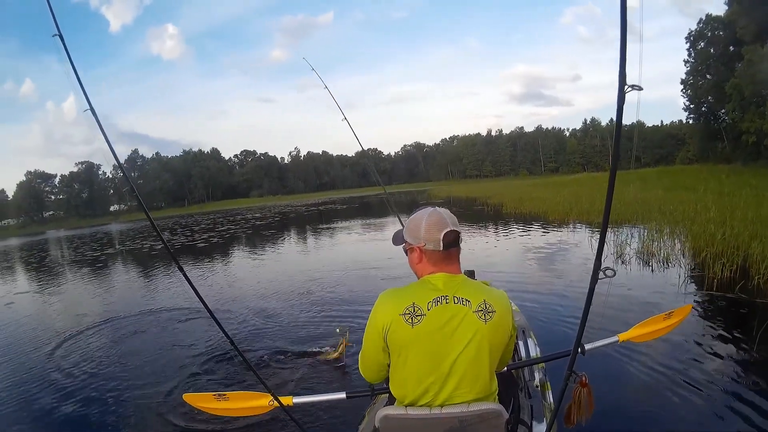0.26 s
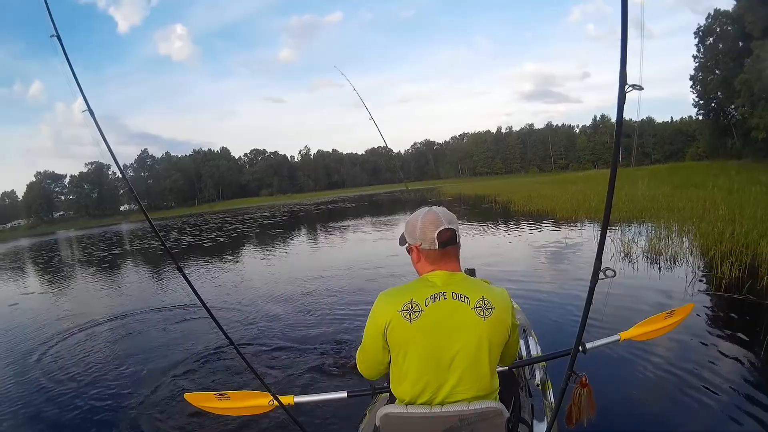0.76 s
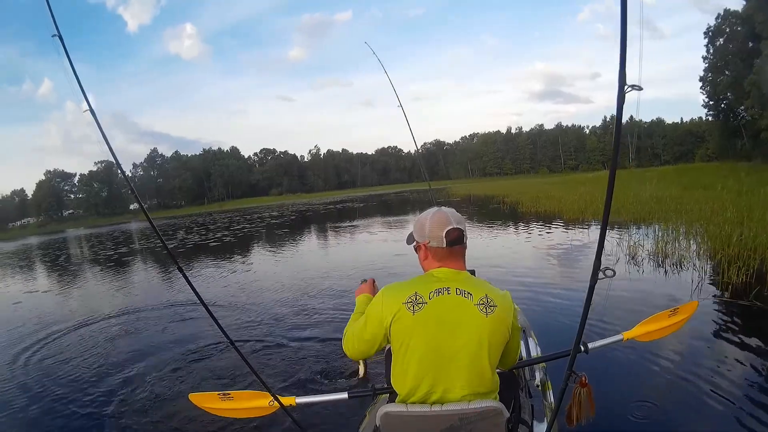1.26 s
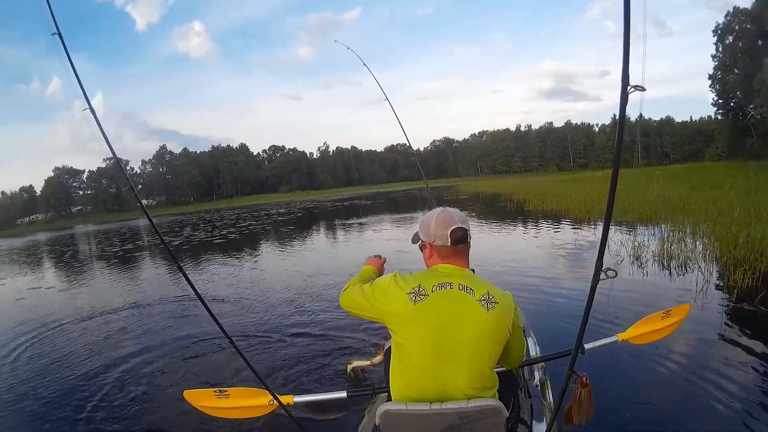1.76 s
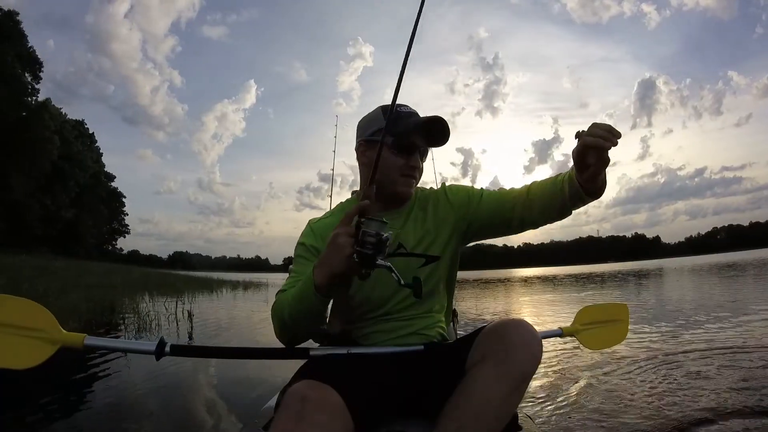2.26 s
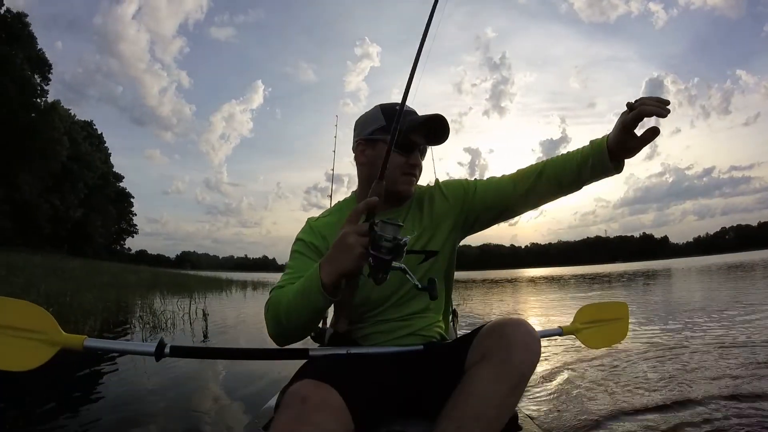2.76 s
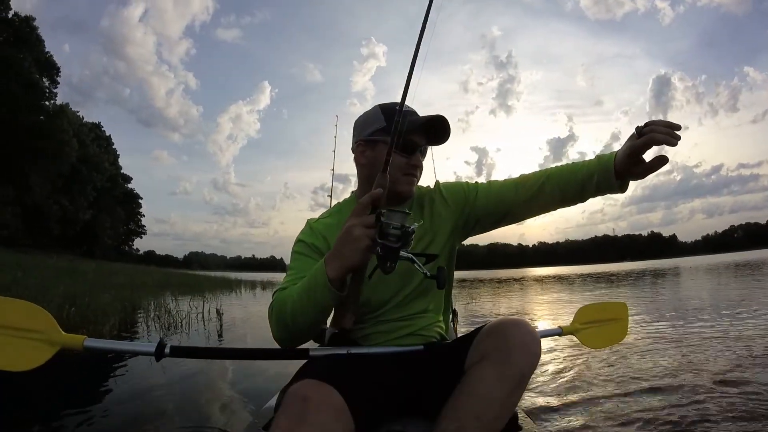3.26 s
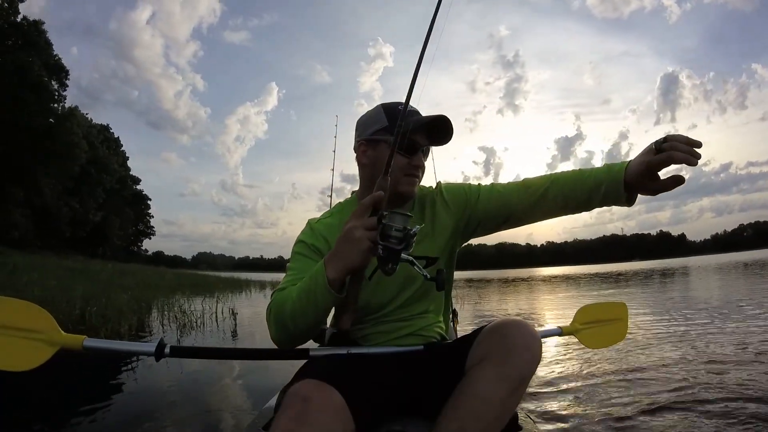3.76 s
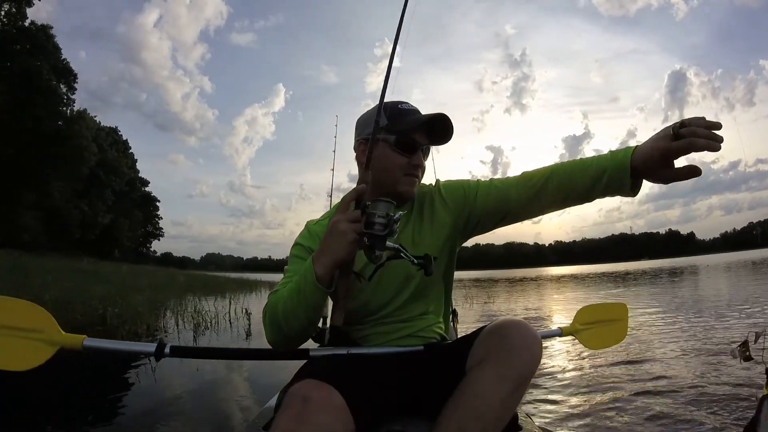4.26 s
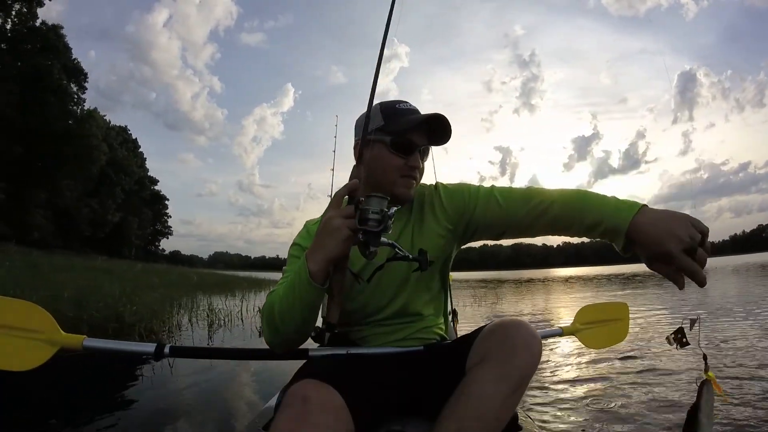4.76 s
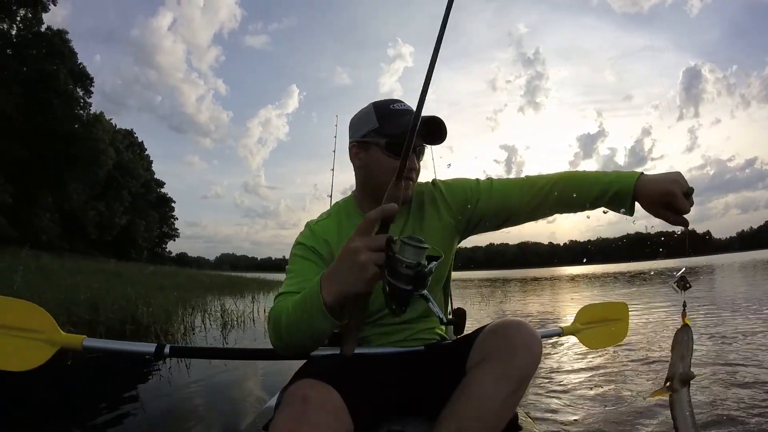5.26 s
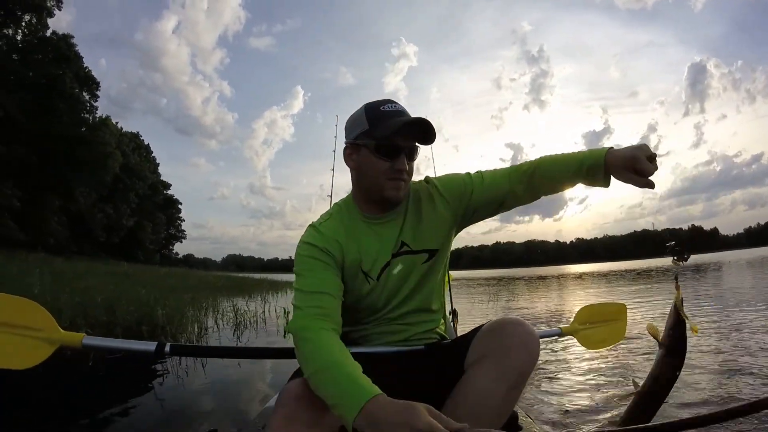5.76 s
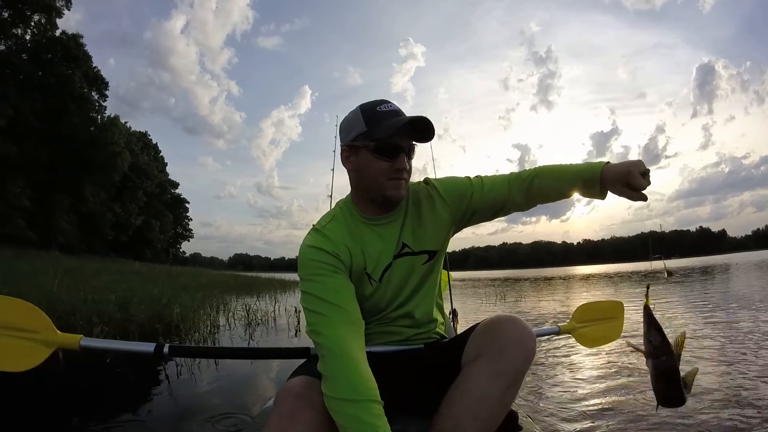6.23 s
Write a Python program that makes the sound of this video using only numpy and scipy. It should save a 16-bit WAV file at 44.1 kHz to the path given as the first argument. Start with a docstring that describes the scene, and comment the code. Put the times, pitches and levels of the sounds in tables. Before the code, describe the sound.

Outdoors on a still lake, heard close beside a kayak over soft air hiss and a low breeze. From the start a warbler whistles a rapid, sweet, high phrase, repeated around 0.6 and 1.3 seconds with a diffuse echo, breaking off near 1.5. From 0.25 to 1.6 a fish thrashes: wet slaps, spray, plopping bubbles and rising gulps, with bright metallic lure jingles, strongest around 1.0 to 1.4. A brief lull holds a few drips near 2.1 to 2.3. From 2.45 to 3.2 a second flurry gurgles and splashes, its rattle sharpest at 2.9. Then it calms; faint far birds chirp at 3.4 to 4.0. Small drips fall at 4.8 and 5.0 as wind buffeting swells and stays. A light hull knock comes at 5.0, lower distant bird notes at 5.1 to 5.4, a lure jingle at 5.65, a tiny tick at 6.1, and a heavier hollow plastic clatter at 6.35.

```python
"""Still lake, beside a kayak: a hooked fish thrashes, a warbler sings on the shore and fainter birds answer.
Bubbles and gulps are gliding sines, small bubbles damped sines; slaps and spray are noise through resonances.
The lure's metal parts rattle as noise bursts ringing narrow modes; birds are gliding sines with a diffuse echo.
A breeze of shaped noise rises on the microphone over hiss; a rod knocks on the plastic hull, ringing its modes."""
import sys
import numpy as np
from scipy import signal
from scipy.fft import rfft, irfft, next_fast_len
from scipy.io import wavfile
from scipy.ndimage import uniform_filter1d, map_coordinates

SR = 44100
rng = np.random.default_rng(int(sys.argv[2]) if len(sys.argv) > 2 else 0)


def put_to_file(sound):
    """Save the sound as 16-bit audio at rate SR, in the file named by the first command-line argument."""
    columns = np.atleast_2d(sound).T  # one column per channel
    safe = np.clip(columns, -1, 1)
    whole_steps = np.round(safe * 32767)
    wavfile.write(sys.argv[1], SR, whole_steps.astype(np.int16))


N = 286473

# Thrashes of the fish. Each row: start in seconds, hold in seconds, then relative levels in dB of
# spray and drops, deep gurgle, jingle of the lure.
THRASHES = [(0.265, 0.016, -58, -65, -55), (0.358, 0.023, -46.5, -44.5, -63),
            (0.532, 0.0073, -46, -45.5, -60), (0.722, 0.07, -43.5, -43, -57.5),
            (0.94, 0.017, -44, -48.5, -46.5), (1.04, 0.013, -45, -45, -46.5),
            (1.177, 0.0079, -47, -47, -53), (1.338, 0.048, -52, -49.5, -47), (2.102, 0.17, -55, -58.5, -61),
            (2.497, 0.033, -50, -50.5, -51.5), (2.641, 0.062, -48.5, -45.5, -54),
            (2.882, 0.037, -43.5, -57.5, -43), (3.022, 0.016, -39, -45, -46)]
# Floor between thrashes. Each row: time in seconds, relative levels in dB of churn and jingle.
CALM = [(0, -59.5, -65.5), (1.6, -55.5, -61.5), (2, -66.5, -85), (3.1, -56.5, -63), (3.5, -66, -74.5),
        (6.5, -62, -74.5)]


def amp(db):
    """Decibels to gain."""
    return 10 ** (np.asarray(db) / 20)


def unit(x):
    """Scaled to rms 1."""
    return x / np.sqrt(np.mean(x ** 2) + 1e-20)


def curves(rows):
    """One value per sample, interpolated, for each column after the time in seconds."""
    time_s, *columns = np.transpose(rows)
    return [np.interp(np.arange(N) / SR, time_s, column) for column in columns]


def wobble(rate_hz):
    """Smooth random curve with rate_hz knots a second."""
    knots = rng.standard_normal(int(N * rate_hz / SR) + 4)
    return map_coordinates(knots, [np.arange(N) * rate_hz / SR])


def filtered(x, response):
    """x through a complex response of frequency in Hz."""
    m = next_fast_len(N + SR // 2)
    return irfft(rfft(x, m) * response(np.fft.rfftfreq(m, 1 / SR)), m)[:N]


def colour(points):
    """Gain through (Hz, dB) points, interpolated on a log frequency axis."""
    point_hz, db = np.transpose(points)
    return lambda hz: amp(np.interp(np.log(hz + 1), np.log(point_hz + 1), db))


def resonant(modes):
    """Causal response: band-pass resonances (Hz, width Hz, dB) summed with alternating sign."""
    def response(f):
        total = 0
        for k, (hz, width_hz, db) in enumerate(modes):
            damping = 1j * f * width_hz
            total = total + (-1) ** k * amp(db) * damping / (hz * hz - f * f + damping)
        return total
    return response


def add(out, start_s, sound):
    """Mixes a sound in at start_s, clipped to the ends of out."""
    i = round(start_s * SR)
    part = out[max(i, 0):i + len(sound)]
    part += sound[max(-i, 0):][:len(part)]


def slide(first_hz, last_hz, life_s, change_db, rise_s, fall_s):
    """Sine gliding exponentially in pitch and level, with linear edges."""
    u = np.arange(int(life_s * SR)) / (life_s * SR)
    edges = np.minimum(1, np.minimum(u * life_s / rise_s, (1 - u) * life_s / fall_s))
    pitch_hz = first_hz * (last_hz / first_hz) ** u
    return edges * amp(change_db * u) * np.sin(2 * np.pi * np.cumsum(pitch_hz) / SR)


def patter(rate_hz, spread_db, t60_s):
    """Noise broken into sudden bursts of random size that die away."""
    starts = (rng.random(N) < rate_hz / SR) * amp(spread_db * rng.standard_normal(N))
    envelope = signal.lfilter([1], [1, -amp(-60 / (t60_s * SR))], starts)
    return envelope * rng.standard_normal(N)


def puff(t60_s, rise_s=0.00059):
    """Short noise burst with exponential rise and decay."""
    t = np.arange(SR // 10) / SR
    return amp(-60 * t / max(t60_s, .002)) * (1 - np.exp(-t / rise_s)) * rng.standard_normal(len(t))


def smear(x, t60_s, db):
    """x plus a diffuse tail: convolution with decaying noise."""
    t = np.arange(SR // 2) / SR
    tail = amp(-60 * t / t60_s) * rng.standard_normal(len(t))
    return x + amp(db) * signal.fftconvolve(x, tail / np.linalg.norm(tail))[:len(x)]


def surges(rows, calm_db):
    """Gain: the calm floor plus (start s, hold s, dB) surges with dB-linear flanks."""
    rise_db_per_s, fall_db_per_s = 277, 229
    t = np.arange(N) / SR
    gain = amp(calm_db)
    for start_s, hold_s, db in rows:
        before_s = np.maximum(start_s - t, 0)
        after_s = np.maximum(t - start_s - hold_s, 0)
        gain = gain + amp(db - rise_db_per_s * before_s - fall_db_per_s * after_s)
    return gain


def air():
    """Lumpy breeze buffeting the microphone, low-weighted noise, over nearly steady air and hiss."""
    # Each row: time in seconds, buffeting level in dB.
    breeze_levels = [(0, -56), (0.3, -49), (1.2, -47), (2, -50), (4.45, -49.5), (4.8, -38.5), (5.3, -39.5),
                     (6.5, -38.5)]
    # Buffeting spectrum. Each row: frequency in Hz, relative density in dB per Hz.
    rumble_spectrum = [(8.8, -17), (43, 2.5), (114, -5), (179, -10.5), (500, -35), (1100, -120)]
    # Lake air and microphone hiss. Each row: frequency in Hz, relative density in dB per Hz.
    hiss_spectrum = [(59, -33), (100, -14), (234, -0.5), (381, -5.5), (621, -6.5), (1330, -16.5),
                     (5420, -27), (14400, -45.5), (16000, -61)]
    lumps = amp(1.5 * wobble(8) + 2.2 * wobble(25))
    rumble = filtered(rng.standard_normal(N), colour(rumble_spectrum))
    breeze = amp(curves(breeze_levels)[0]) * unit(lumps * rumble)
    hiss = unit(filtered(rng.standard_normal(N), colour(hiss_spectrum)))
    return breeze + amp(-52 + 0.19 * wobble(23)) * hiss


def birds():
    """Whistles as gliding sines, level fluttering, trailed by echoes from the tree line."""
    # The warbler's six notes, a list of rows each: seconds after note start, pitch in Hz, level in dB.
    notes = [
        [(0, 5796, -45), (.015, 5800, -31.5), (.026, 5500, -43), (.034, 4800, -38), (.055, 4540, -40)],
        [(0, 4206, -61), (.015, 4110, -40.5), (.045, 3430, -45), (.07, 2590, -74)],
        [(0, 3900, -63), (.035, 4570, -38.5), (.055, 5020, -41.5), (.1, 5050, -72)],
        [(0, 4360, -51), (.04, 4020, -36), (.065, 3600, -50), (.08, 2890, -40)],
        [(0, 2750, -64), (.035, 3150, -50.5), (.05, 4600, -49), (.06, 4780, -35.5), (.072, 4200, -46),
         (.092, 3600, -40.5)],
        [(0, 4700, -70), (.012, 5020, -44), (.028, 5280, -37.5), (.11, 5300, -69)],
    ]
    # Start of each note in the phrase, in seconds.
    note_starts_s = [0, .117, .19, .316, .467, .555]
    # Starts of the phrase, in seconds.
    phrase_starts_s = [-.052, .615, 1.27]
    # Far birds. Each row: start in seconds, first Hz, last Hz, life in seconds, starting level in dB.
    far_slides = [(3.44, 3300, 4300, .05, -63), (3.55, 5100, 3400, .06, -62), (3.7, 3900, 5400, .04, -63),
                  (3.93, 5500, 4900, .03, -65), (5.125, 2600, 2480, .065, -60), (5.2, 2200, 2060, .12, -61),
                  (5.35, 2450, 2100, .095, -61), (5.83, 2400, 2150, .08, -63)]
    last_s = 1.5  # the warbler breaks off in the third phrase
    out = np.zeros(SR + N)  # starts a second early, so that earlier notes leave their echo
    for note, offset_s in zip(notes, note_starts_s):
        time_s, hz, db = np.transpose(note)
        t = np.arange(0, time_s[-1], 1 / SR)
        pitch_hz = uniform_filter1d(np.interp(t, time_s, hz), size=200, mode="nearest")
        level = signal.windows.tukey(len(t), .15) * amp(np.interp(t, time_s, db))
        whistle = level * np.sin(2 * np.pi * np.cumsum(pitch_hz) / SR)
        for phrase_s in phrase_starts_s:
            if phrase_s + offset_s < last_s:
                add(out, 1 + (phrase_s + offset_s), whistle)
    for start_s, first_hz, last_hz, life_s, db in far_slides:
        add(out, 1 + start_s, amp(db) * slide(first_hz, last_hz, life_s, -2.7, 0.0082, 0.0058))
    echo = (smear(out, 0.45, -3.5) - out)[SR:]
    flutter = amp(2.5 * wobble(90))
    # the leaves swallow the highest notes of the echo
    return flutter * out[SR:] + filtered(echo, lambda hz: 1 / (1 + (hz / 5500) ** 16))


def fizz(hz, octaves, cycles, count):
    """Random small bubbles: damped sines rising in pitch; lower ones ring longer."""
    draw, when = rng.standard_normal((count, 2)), rng.random((count, 1))
    pitch_hz = hz * 2 ** (octaves * draw[:, :1])
    turns = pitch_hz * np.arange(1000) / SR
    size = amp(4.3 * draw[:, 1:])
    grain = size * np.exp(-turns / cycles) * (1 - np.exp(-2 * turns))
    grain = grain * np.sin(2 * np.pi * turns * (1 + .04 * turns / cycles))
    index = (when * N).astype(int) + np.arange(1000)
    return unit(np.bincount(index.ravel(), grain.ravel(), N + 1000)[:N])


def water():
    """Ringing bubbles, swelling gulps, slaps, and a churn of small bubbles and spray driven by thrashes."""
    # Bubbles that ring and die away. Each row: start in seconds, first Hz, last Hz, life in seconds,
    # starting level in dB.
    ringing_bubbles = [(0.25, 740, 485, 0.014, -25), (0.3519, 820, 670, 0.011, -27),
                       (0.418, 820, 860, 0.013, -25.5), (0.5085, 640, 571, 0.0083, -29),
                       (0.6534, 394, 520, 0.014, -28), (0.6826, 740, 830, 0.011, -25),
                       (0.6982, 664, 780, 0.0096, -19.5), (0.7586, 1040, 700, 0.0054, -30),
                       (0.9458, 730, 750, 0.013, -25), (1.0766, 925, 950, 0.016, -33),
                       (1.1813, 660, 615, 0.051, -32), (1.2751, 540, 478, 0.044, -35),
                       (1.5644, 594, 666, 0.016, -31), (1.5804, 754, 520, 0.009, -30),
                       (1.5919, 735, 1560, 0.022, -33), (2.132, 1130, 800, 0.0092, -34.5),
                       (2.161, 572, 790, 0.085, -39), (2.205, 990, 1530, 0.028, -39.5),
                       (2.4568, 850, 600, 0.0057, -23), (2.5495, 920, 965, 0.023, -27),
                       (2.6008, 485, 325, 0.03, -25.5), (2.6226, 724, 950, 0.006, -17),
                       (2.6239, 217, 504, 0.023, -22), (2.6969, 614, 766, 0.036, -24.5),
                       (2.7445, 357, 710, 0.022, -23), (2.7989, 553, 586, 0.029, -33.5),
                       (2.642, 274, 352, 0.013, -30), (3.0231, 1020, 814, 0.011, -26),
                       (3.0327, 470, 650, 0.0068, -22), (3.106, 990, 900, 0.009, -30),
                       (3.1208, 890, 850, 0.011, -24.5), (3.1854, 645, 1190, 0.035, -35),
                       (4.778, 1030, 870, 0.029, -40.5)]
    # Air pockets that swell until they close. Columns as for the bubbles.
    air_pockets = [(0.265, 297, 1090, 0.045, -28), (0.4445, 268, 452, 0.038, -42.5),
                   (0.715, 837, 423, 0.021, -31), (0.802, 640, 890, 0.011, -37),
                   (1.144, 313, 970, 0.02, -22.5), (1.164, 950, 810, 0.011, -31),
                   (1.4725, 780, 1190, 0.006, -34.5), (2.5243, 627, 1070, 0.0136, -38),
                   (2.5762, 770, 693, 0.0058, -17.5), (2.9817, 928, 890, 0.041, -40.5)]
    # Water slapping the surface. Each row: start in seconds, relative level in dB, pitch in Hz.
    slaps = [(0.2484, -31.5, 2100), (0.3675, -35, 2220), (0.457, -37, 2284), (0.5523, -38, 2400),
             (0.663, -39, 2410), (0.718, -30.5, 1950), (0.748, -27.5, 1990), (0.8003, -27, 1880),
             (0.819, -39, 2040), (0.842, -37, 2100), (0.908, -34, 2310), (0.965, -33, 1960),
             (1.011, -47, 3120), (1.034, -34, 2500), (1.144, -34, 1990), (1.1912, -34, 2180),
             (2.089, -36.5, 2370), (2.112, -42, 2900), (2.1537, -36, 1930), (2.2038, -31, 2230),
             (2.247, -42, 2630), (2.2633, -39, 2170), (2.2798, -35, 1970), (2.4562, -28.5, 2150),
             (2.606, -41, 3500), (2.6226, -39.5, 2360), (2.658, -29.5, 2070), (2.8939, -34, 1900),
             (2.9363, -35.5, 1930), (3.052, -31.5, 2180), (3.072, -35, 2000), (3.177, -41, 2170),
             (4.7792, -46, 2244), (4.999, -40, 1710)]
    out, spray = np.zeros(N), np.zeros(N)
    for table, change_db in (ringing_bubbles, -21), (air_pockets, 5.5):  # change over a life
        for start_s, first_hz, last_hz, life_s, db in table:
            add(out, start_s, amp(db) * slide(first_hz, last_hz, life_s, change_db, 0.0013, 0.0026))
    for start_s, db, hz in slaps:
        trapped_bubble = slide(hz, 1.04 * hz, 0.0074, -7.0, 0.0015, 0.0039)
        add(out, start_s, amp(db) * trapped_bubble)
        add(spray, start_s, amp(db + 7.0) * puff(0.015))
    gurgle = amp(2.5) * fizz(785.5, 0.327, 4.93, count=1300)
    plinks = amp(-6.5) * fizz(2086, 0.218, 8.4, count=1400)
    plinks += amp(-11.5) * fizz(3424, 0.31, 6.1, count=1500)
    churn_db = curves(CALM)[0]
    stir = surges([row[:3] for row in THRASHES], churn_db)
    deep = surges([(start_s, hold_s, db) for start_s, hold_s, _, db, _ in THRASHES], churn_db)
    spray += amp(-2) * stir * unit(patter(150, 5.3, 0.0048))
    # ripples shake the bubbles, the hull side answers
    bubbles = smear(amp(0.64 * wobble(120)) * out, 0.084, -8)
    splash = filtered(spray, resonant([(800, 270, 6.0), (2173, 400, 10.0), (4500, 1300, -3.5)]))
    return bubbles + deep * gurgle + stir * plinks + splash


def lure():
    """Loose metal parts: noise bursts ring narrow modes; drops flung off them crackle broadly."""
    # Hard shakes. Each row: start in seconds, relative level in dB.
    shakes = [(0.7168, -26.5), (0.9627, -23), (1.041, -34), (1.2465, -27), (1.2545, -28), (1.271, -22.5),
              (1.297, -38), (1.327, -27.5), (1.339, -32), (1.37, -36), (1.404, -32), (1.424, -36),
              (1.466, -41), (1.5715, -41), (2.0742, -34), (2.447, -30.5), (2.6554, -34), (2.68, -32.5),
              (2.8558, -31), (2.874, -22.5), (2.894, -19.5), (2.9225, -28), (2.9295, -30), (2.959, -31),
              (2.9969, -30.5), (3.03, -30), (3.051, -31.5), (3.1754, -40), (5.1153, -47.5), (5.238, -46.5),
              (5.564, -40.5), (5.6505, -27.5), (5.692, -36), (5.717, -32), (5.872, -47)]
    # Jerks of the fish in the air. Each row: start in seconds, hold in seconds, relative level in dB.
    jerks = [(5.655, 0.039, -46), (5.77, 0.16, -61.5), (6.35, 0.094, -62.5)]
    # Ringing modes of the metal. Each row: frequency in Hz, width in Hz, relative level in dB.
    metal_modes = [(6110, 187, 6), (6486, 98, 3.5), (8040, 23, -5), (11380, 100, -6), (12220, 200, -10)]
    # Mode that rings only out of the water. Columns as for the metal modes.
    free_mode = [(6630, 79, 7.7)]
    hangs_s = 4.9  # out of the water from here
    thrash_jingles = [(start_s, hold_s, db) for start_s, hold_s, *_, db in THRASHES]
    jingle = surges(thrash_jingles + jerks, curves(CALM)[1])
    chatter = amp(11.5) * jingle * unit(patter(160, 4, 0.023))
    for start_s, db in shakes:
        add(chatter, start_s, amp(db + 10.0) * puff(0.02, 0.00077))
    steep = resonant([(8170, 4900, 0)])  # sharpens the modes' skirts
    ring = np.zeros(N)
    for mode in metal_modes:
        # as the parts tumble, each mode is struck harder or softer from moment to moment
        strike = amp(3.0 * wobble(60)) * chatter
        ring += filtered(strike, lambda f: resonant([mode])(f) * steep(f))
    hanging = np.arange(N) > hangs_s * SR
    free_strike = amp(-3.5 + 10 * wobble(60)) * chatter * hanging
    ring += filtered(free_strike, lambda f: resonant(free_mode)(f) * steep(f))
    crackle = filtered(chatter, resonant([(3220, 590, -7.0), (12000, 1000, -17.5)]))
    return ring + crackle


def hull():
    """Rod on plastic: each blow rings the shell's low modes and cracks at the contact."""
    # Blows. Each row: start in seconds, relative thud level in dB, relative crack level in dB.
    blows = [(5.018, -33, -27), (5.035, -34.5, -45), (6.115, -58, -38.5), (6.137, -60, -40.5),
             (6.329, -23.5, -25), (6.335, -18, -39), (6.342, -32.5, -36), (6.351, -18, -35),
             (6.364, -45, -30), (6.39, -19, -56)]
    # Shell modes. Each row: frequency in Hz, mean relative level in dB, 60 dB decay in seconds.
    shell_modes = [(232, 6, 0.029), (318, -7.5, 0.055), (449, -1.5, 0.058), (888, -12.5, 0.04)]
    # Contact resonances. Each row: frequency in Hz, width in Hz, relative level in dB.
    crack_modes = [(810, 130, 8.5), (2240, 730, 3), (3410, 320, 8.5), (4600, 2100, -4)]
    out, cracks, t = np.zeros(N), np.zeros(N), np.arange(SR // 5) / SR
    for start_s, thud_db, crack_db in blows:
        ring = np.zeros(len(t))
        for hz, db, t60_s in shell_modes:
            level_db = db + rng.normal(0, 2.5)  # varies from blow to blow
            ring += amp(level_db - 60 * t / t60_s) * np.sin(2 * np.pi * hz * t)
        add(out, start_s, -amp(thud_db) * ring * (1 - np.exp(-t / 0.0016)))
        add(cracks, start_s, amp(crack_db + 5.5) * puff(0.019))
    return out + filtered(cracks, lambda f: resonant(crack_modes)(f) / (1 + 1j * f / 6000))


def scene():
    """All sources at one microphone."""
    return (air() + birds() + water() + lure() + hull())[None]


def record(dry):
    """Band limit: nothing passes from 15.3 kHz up."""
    return filtered(dry[0], lambda hz: hz < 15300)[None]


dry = scene()
out = record(dry)
put_to_file(out)
```